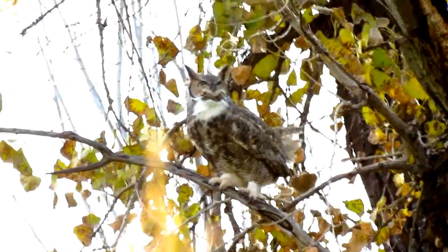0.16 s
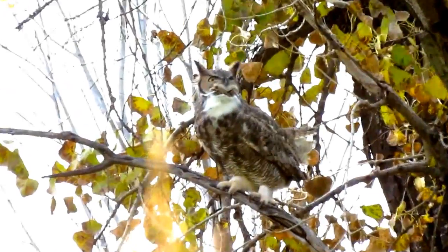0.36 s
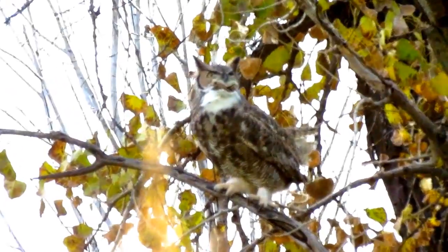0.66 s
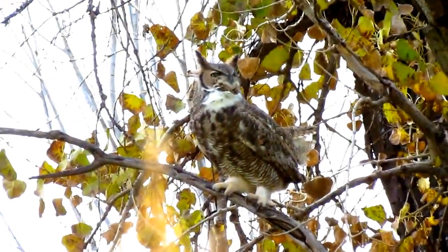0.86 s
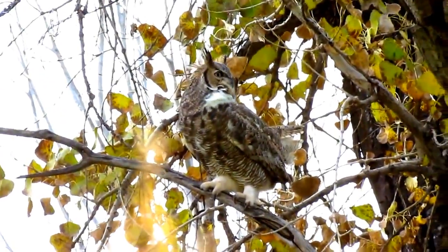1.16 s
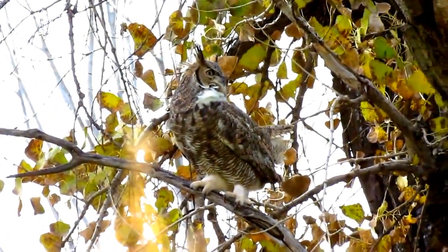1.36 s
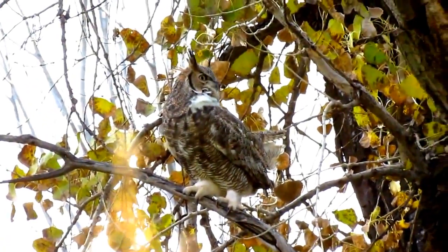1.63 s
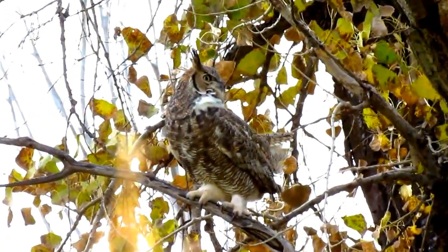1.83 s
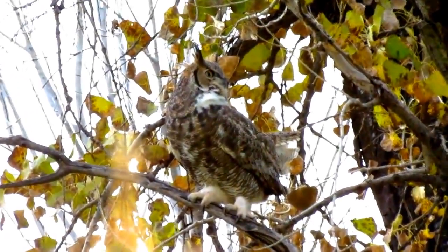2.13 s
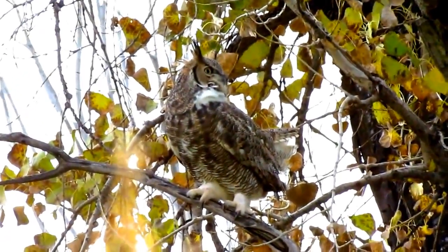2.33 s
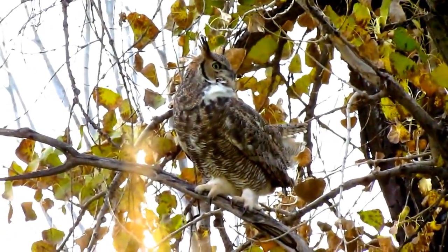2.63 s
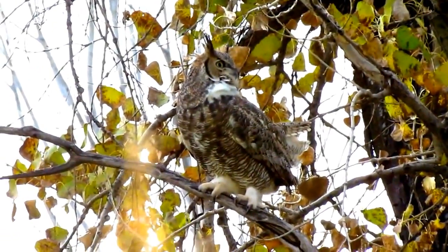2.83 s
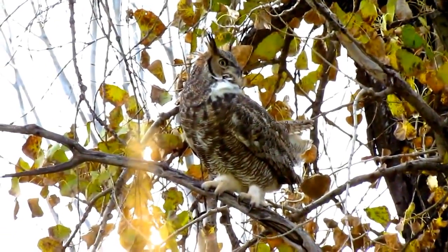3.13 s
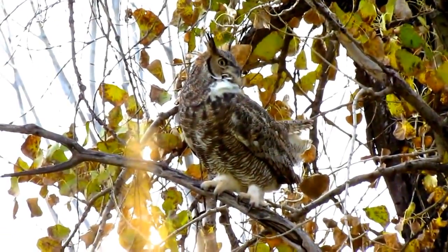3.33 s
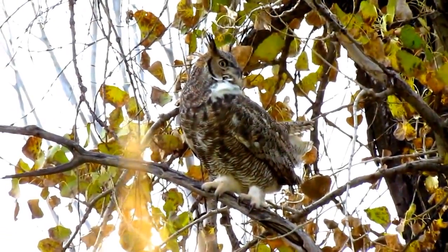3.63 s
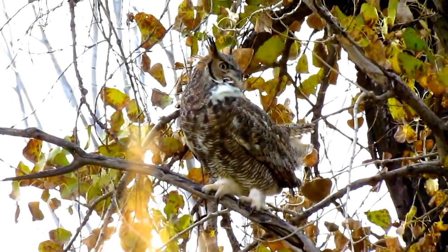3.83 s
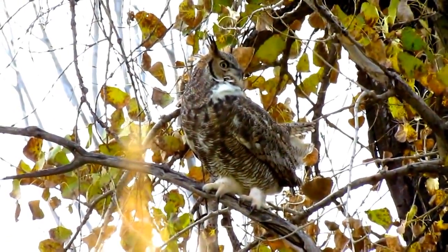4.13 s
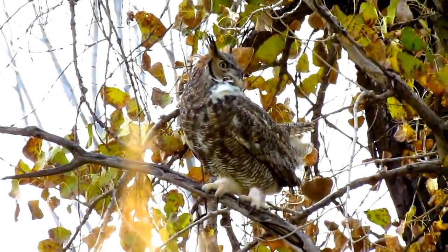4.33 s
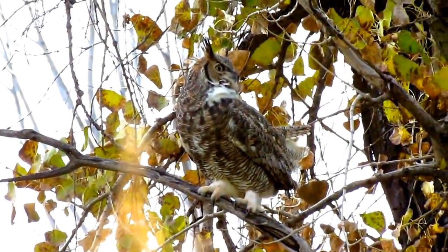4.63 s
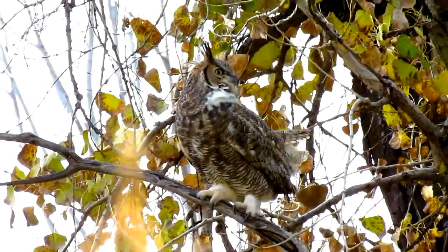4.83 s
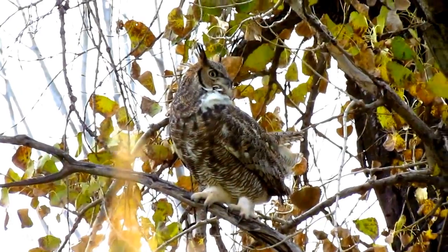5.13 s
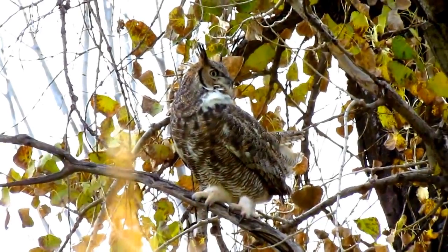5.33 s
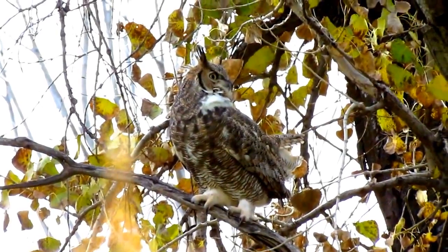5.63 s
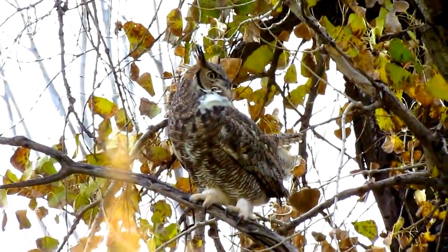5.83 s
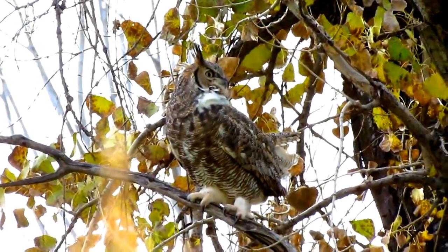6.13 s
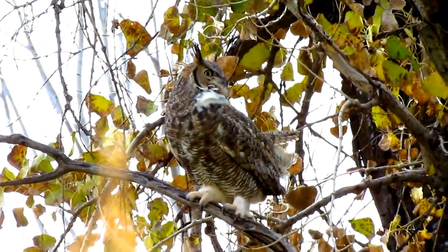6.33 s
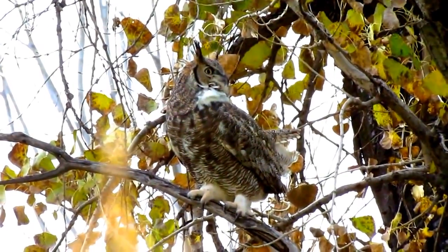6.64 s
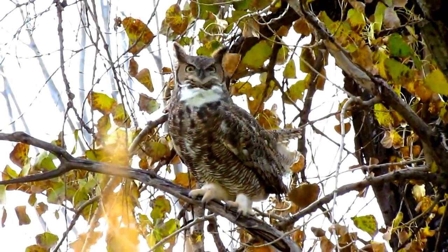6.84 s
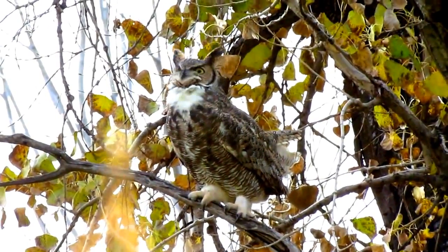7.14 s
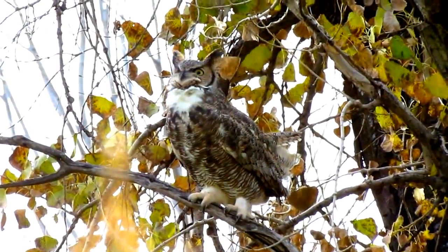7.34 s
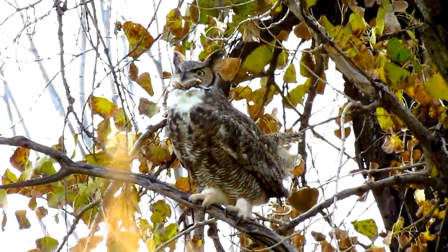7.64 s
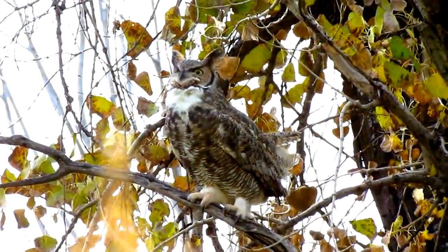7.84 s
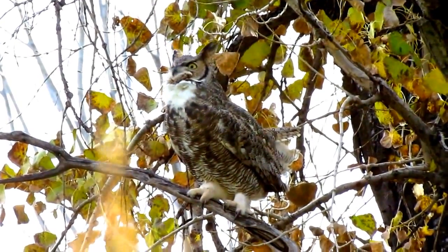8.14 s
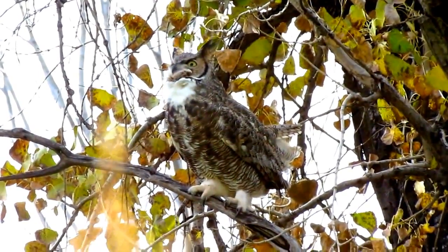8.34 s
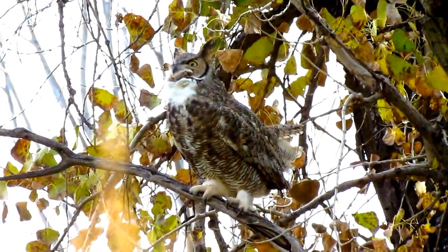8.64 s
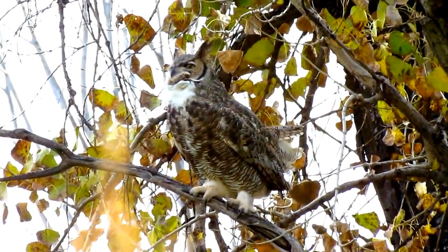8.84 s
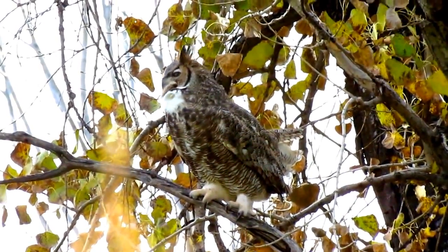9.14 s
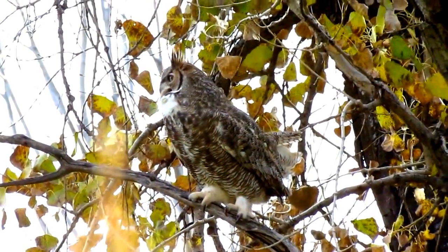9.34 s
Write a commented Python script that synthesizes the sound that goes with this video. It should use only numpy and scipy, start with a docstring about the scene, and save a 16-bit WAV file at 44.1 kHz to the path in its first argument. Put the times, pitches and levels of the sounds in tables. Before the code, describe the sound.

A sparrow repeats short, hoarse chirps in the branches over the soft rumble of far roads. At first, sharp clicks, finger scuffs and brief gritty lens whirs from a camera sound very close and stand out above everything else, then thin to occasional light ticks. A barely audible cricket pulses, a smaller bird lisps now and then, and a high, pulsing insect rasp rises faintly at the end.

```python
"""Under an autumn tree, far traffic washes and hums behind a faint cricket from start to end.
In the first two seconds a hand-held camera, aimed at a silent owl, clicks, its lens motor whirs
and a finger scuffs its shell. A few softer clicks follow, while a sparrow keeps chirping among the
branches and a smaller bird lisps. Towards the end the rasp of an insect's wings swells."""
import sys
import numpy as np
from scipy import signal
from scipy.fft import rfft, irfft, next_fast_len
from scipy.io import wavfile
from scipy.ndimage import map_coordinates

SR = 44100
rng = np.random.default_rng(int(sys.argv[2]) if len(sys.argv) > 2 else 0)


def digitize_waveform(pressure):
    """Quantize a signal to 16-bit integers and store it at the path in sys.argv[1].

    Rows of a 2-D input are taken as channels; values are limited to [-1, 1].
    """
    field = np.atleast_2d(pressure).T
    bounded = np.clip(field, -1, 1)
    quanta = np.round(bounded * 32767).astype(np.int16)
    wavfile.write(sys.argv[1], SR, quanta)


N = 418068


def amp(db):
    """Turn decibels into a gain to multiply by."""
    return 10 ** (np.asarray(db) / 20)


def unit(x):
    """Scale a sound to an average (rms) level of 1."""
    return x / np.sqrt(np.mean(x ** 2) + 1e-20)


def clock():
    """The time of every sample, in seconds."""
    return np.arange(N) / SR


def bell(t, centre, width):
    """A smooth bump of height 1, down to 0.6 at one width from its centre."""
    return np.exp(-((t - centre) / width) ** 2 / 2)


def along(points, hz):
    """Read between a table's (frequency, value) points, with octaves evenly spaced."""
    known_hz, values = np.transpose(points)
    return np.interp(np.log(hz + 1), np.log(known_hz + 1), values)


def wobble(rate, samples=N):
    """A smooth curve through rate random values a second."""
    points = rng.standard_normal(int(samples * rate / SR) + 4)
    return map_coordinates(points, [np.arange(samples) / SR * rate])


def cycles(hz):
    """The running phase, in radians, of a changing pitch."""
    return 2 * np.pi * np.cumsum(hz) / SR


def filtered(x, response):
    """Scale each frequency in x by response(hz)."""
    size = next_fast_len(N + 8192)
    return irfft(rfft(x, size) * response(np.fft.rfftfreq(size, 1 / SR)), size)[..., :N]


def add(track, start_s, sound):
    """Mix a sound into a track from start_s on."""
    at = round(start_s * SR)
    part = sound[..., max(-at, 0):N - at]
    track[..., max(at, 0):max(at, 0) + part.shape[-1]] += part


def rush(spectrum, left_lead_s=0):
    """Stereo noise shaped by a spectrum; the two sides are most alike in the bass."""
    # how alike left and right are: frequency_hz, likeness (1 = the same)
    alike = [(60, 0.93), (130, 0.85), (290, 0.91), (640, 0.86), (1410, 0.57), (3100, 0.06), (6820, 0.034),
             (15000, -0.2)]
    spread = lambda hz: np.arccos(np.clip(along(alike, hz), -1, 1)) / 2
    colour = lambda hz: amp(along(spectrum, hz)) * [np.cos(spread(hz)), np.sin(spread(hz))]
    mid, side = filtered(rng.standard_normal((2, N)), colour)
    return unit(np.array([mid + side, np.roll(mid - side, round(left_lead_s * SR))]))


def trees(call, echo_db, fade_s, side_db):
    """Trunks and leaves scatter a call into echoes that fall 60 dB in fade_s."""
    t = np.arange(SR * 3 // 4) / SR
    mid, side = rng.standard_normal((2, len(t))) * amp(-60 * t / fade_s) * (1 - np.exp(-t / 0.0009))
    paths = np.array([mid + amp(side_db) * side, mid - amp(side_db) * side])
    paths *= amp(echo_db) / np.linalg.norm(paths[0])
    paths[:, 0] += 1  # the direct path
    heard = signal.fftconvolve(call[None], paths, axes=1)
    return heard * np.linalg.norm(call) / np.linalg.norm(heard[0])


def traffic(drone_hz=73.9, waver_hz=0.615):
    """Far roads rumble, tyres wash, one engine drones and others come and go, over an even hiss."""
    # tone of the road rumble, the tyres and the hiss: frequency_hz, level_db
    rumble_tone = [(15, -13), (28, 0.5), (44, 4.5), (60, 2), (80, -11.5), (90, 4.5), (99, -5.5),
                   (110, -0.5), (125, -4), (150, -8), (300, -12), (600, -44.5)]
    tyre_tone = [(90, -6.5), (180, -2), (280, -1.5), (420, -4.5), (650, -2), (850, -1), (1050, -2.5),
                 (1300, -10), (1600, -17), (2000, -26.5), (3000, -58)]
    hiss_tone = [(800, -3.5), (2000, 5), (3000, 4), (5000, -0.5), (7500, -4), (10000, -7.5), (13000, -12.5),
                 (15500, -48)]
    # passing engines: nearest_s, width_s, pitch_hz, level_db
    engines = [(2.2, 0.72, 91.7, -51.5), (4.7, 1.1, 107.6, -54), (7.8, 1.2, 92.1, -54),
               (8.8, 0.42, 134.9, -49.5)]
    t = clock()
    rumble = amp(-46 + 0.18 * t + 0.8 * wobble(4.4)) * rush(rumble_tone)  # slowly builds
    busy_db = 2 * bell(t, centre=8.56, width=1.04)  # the road is busiest near the end
    wash = amp(-42 + busy_db + 0.17 * wobble(11)) * rush(tyre_tone, left_lead_s=0.0001)
    hum = lambda hz: np.sqrt(2) * np.sin(cycles(hz + waver_hz * wobble(5)))
    swell_db = 3 * bell(t, centre=5.55, width=0.74)
    drone = amp(-50 + swell_db + 1.8 * wobble(3.5)) * hum(drone_hz)  # fades in and out on the air
    passing = sum(amp(db) * bell(t, at_s, width_s) * hum(hz) for at_s, width_s, hz, db in engines)
    return rumble + wash + drone + passing + amp(-58) * rush(hiss_tone)


def cricket(pitch_hz=2110, width_hz=82, trill_at_s=4.256, every_s=0.746):
    """A faint, narrow trill comes in a slow, even beat, blurred by distance."""
    song = rush([(pitch_hz - 4 * width_hz, -50), (pitch_hz - width_hz, -4), (pitch_hz, 0),
                 (pitch_hz + width_hz, -4), (pitch_hz + 4 * width_hz, -50)])
    beat_db = 3 * np.tanh(2 * np.cos(2 * np.pi * (clock() - trill_at_s) / every_s))
    return amp(-64 + beat_db + 0.69 * wobble(8.5)) * song


def insect_rasp(phrase_s=0.1935, phrase_end_s=8.914, stroke_gap_s=0.019, full_s=9.4, rise_db_per_s=7):
    """An insect rasps in phrases of quick wing strokes; each phrase grows, then breaks off."""
    # tone of the wings: frequency_hz, level_db
    wing_tone = [(3500, -5), (6500, 8), (10800, 3), (13000, -3), (15500, -6)]
    t = clock()
    to_end_s = (phrase_end_s - t + stroke_gap_s) % phrase_s - stroke_gap_s
    strokes_left = np.maximum(np.round(to_end_s / stroke_gap_s), 0)
    strokes = amp(-1.5 * strokes_left) * bell(to_end_s, strokes_left * stroke_gap_s, width=0.002)
    blur = amp(-11) * bell(to_end_s, stroke_gap_s, width=0.04)
    warm_up_db = -51 - rise_db_per_s * np.maximum(full_s - t, 0)
    song = amp(warm_up_db) * (strokes + blur) * rush(wing_tone)[0]
    return np.array([np.roll(song, 3), song])  # reaches the left side three samples later


def small_bird():
    """A smaller bird lisps thin, quivering whistles from farther branches."""
    # gliding notes: start_s, length_s, from_hz, to_hz, relative_db
    lisps = [(0.755, .02, 8500, 8200, -62), (2.208, 0.018, 8200, 8500, -65),
             (5.603, 0.057, 5900, 7660, -56), (6.448, 0.069, 6100, 6900, -64),
             (6.248, 0.013, 5000, 4300, -57), (9.015, 0.35, 3380, 4000, -66),
             (9.157, 0.15, 4970, 5100, -68), (9.261, 0.18, 3990, 4450, -59.5)]
    out = np.zeros((2, N))
    for start_s, length_s, from_hz, to_hz, db in lisps:
        progress = np.linspace(0, 1, int(length_s * SR))
        glide_hz = from_hz + (to_hz - from_hz) * progress
        quiver = 1 + 0.04 * wobble(600, len(progress))
        note = np.sin(np.pi * progress) * np.sin(cycles(glide_hz * quiver))
        add(out, start_s, trees(2 * amp(db) * note, echo_db=1.5, fade_s=0.35, side_db=3))
    return out


def sparrow(rise_s=0.019, hold_s=0.048, fall_s=0.023, arch_depth=0.25):
    """Each hoarse chirp arches twice in pitch; the throat favours the octave above that pitch."""
    # chirps: start_s, relative_db, top_pitch_hz
    chirps = [(-0.06, -46.5, 1927), (0.597, -44.5, 1920), (1.312, -46, 1892), (1.917, -44, 1960),
              (2.774, -49, 1880), (3.803, -46, 1950), (4.551, -45.5, 1948), (5.142, -46.5, 1946),
              (6.077, -47.5, 1882), (6.846, -45, 1923), (7.393, -44.5, 1816)]
    # pitch arches within a chirp: middle_s, width_s
    arches = [(.043, .018), (.09, .014)]
    # how the throat shapes the voice: frequency_hz, gain_db
    throat = [(1500, -18), (1850, -8), (2600, -8), (3100, -2.5), (3900, 2.5), (4450, -9), (5150, -1.5),
              (5750, -10), (6250, -9), (7200, -25)]
    out, t = np.zeros((2, N)), np.arange(SR // 8) / SR
    effort = np.minimum(t / rise_s, 1) * np.exp(-np.maximum(t - rise_s - hold_s, 0) / fall_s)
    beak_db = -14.5 + 20 * bell(t, 0, width=0.026)  # the closing beak dulls the upper overtones
    bumps = np.max([bell(t, middle_s, width_s) for middle_s, width_s in arches], axis=0)
    tune = 1 - arch_depth * (1 - bumps)
    for start_s, db, top_hz in chirps:
        quiver, grate, drift = (wobble(rate, len(t)) for rate in (900, 600, 40))
        pitch_hz = top_hz * tune * (1 + 0.033 * quiver + 0.012 * drift)
        phase = cycles(pitch_hz)
        voice = sum(amp(along(throat, k * pitch_hz) + beak_db * (k > 2)) * np.sin(k * phase)
                    for k in range(1, 5))
        chirp = amp(db + 1 + 2.5 * grate) * effort * voice
        add(out, start_s, trees(chirp, echo_db=5.5, fade_s=0.58, side_db=0.5))
    return out


def finger_scuffs(grain_db=3):
    """Skin catches and slides on the camera's shell."""
    # scuffs: middle_s, level_db, width_s
    scuffs = [(0.023, -51, 0.0022), (0.054, -40.5, 0.0038), (1.35, -44.5, 0.0089), (1.389, -44, .003),
              (1.402, -44, .002), (1.595, -57.5, 0.011)]
    # tone of the sliding skin: frequency_hz, level_db
    skin_tone = [(1500, -10), (4000, 7.5), (6000, 4), (9000, -1), (13000, -7), (16000, -12)]
    t = clock()
    pressure = sum(amp(db) * bell(t, middle_s, width_s) for middle_s, db, width_s in scuffs)
    return pressure * unit(rush(skin_tone) * amp(grain_db * wobble(1300)))


def lens_motor(grain_db=1.5, flutter_db=1.7, ramp_s=0.012):
    """The lens gears whir in short, gritty runs."""
    # motor runs: start_s, end_s, level_db
    runs = [(0.137, 0.54, -50.5), (1.692, 1.79, -55.5), (1.785, 2.01, -50.5)]
    # tone of the gears: frequency_hz, level_db
    gear_tone = [(500, -32), (1400, 16), (2200, 12), (2900, 3.5), (3800, 6), (4600, 3.5), (7000, 2.5),
                 (8200, 6), (9200, 3), (11400, 5.5), (13300, -1), (14200, -14), (16000, -4)]
    t = clock()
    running = sum(amp(db) * np.clip(np.minimum(t - start_s, end_s - t) / ramp_s + 0.5, 0, 1)
                  for start_s, end_s, db in runs)
    return running * unit(rush(gear_tone) * amp(grain_db * wobble(400) + flutter_db * wobble(40.9)))


def camera_clicks(part_fade_s=0.021, crack_fade_s=0.02, crack_hz=1100):
    """Each click rings the shell and the touched part; a softer contact leaves the high notes quiet."""
    # clicks: start_s, level_db, brightness_hz, left_minus_right_db, part_pitch_hz, part_relative_db
    clicks = [(0.0235, -21.5, 1990, -3, 616, -8), (0.0516, -40, 7000, -3, 610, -6),
              (0.172, -32.5, 1800, 0, 970, 3.5), (0.496, -40.5, 2970, 2, 1600, 7),
              (0.5328, -20.5, 1500, 0, 890, 0.5), (0.6584, -8.5, 6600, -6, 1700, -13),
              (1.1499, -42, 3480, -2, 950, -10), (1.418, -23, 7050, -7.5, 3490, -2.5),
              (1.6931, -14, 794, 8.5, 1465, -2.5), (1.802, -35, 3000, 3, 2080, -10),
              (1.9465, -9.5, 7000, -6.5, 1580, -13), (2.006, -29, 2570, -9, 1560, -1),
              (3.8163, -29, 7840, -8, 3100, -2.5), (4.8142, -45, 4000, 0, 3120, -6),
              (4.8394, -41, 4500, 0, 3150, -10), (6.194, -40.5, 4460, 3, 3100, -6)]
    # notes of the plastic shell: pitch_hz, level_db, fade_s (to fall 60 dB), left_minus_right_db
    shell = [(597, -14, 0.039, -2.5), (810, -15.5, 0.058, -3.5), (1100, -8, 0.011, -11),
             (1443, -11, 0.033, -12.5), (1625, -7, 0.026, -7), (2052, -12.5, 0.029, 23),
             (2320, -7, 0.017, 5), (2780, -13, 0.019, -5), (3150, -17.5, 0.03, 9), (3985, -6, 0.011, -17),
             (4300, -6, 0.005, -2), (5340, -5.5, 0.0071, -10), (6130, -8, 0.0096, 0), (7000, -9, 0.01, -1),
             (8990, -9, 0.0074, 12), (10400, -13, 0.0093, -2), (11750, -14, .009, 2), (12450, -11, .009, 2),
             (13500, -18, .008, 6)]
    out, t = np.zeros((2, N)), np.arange(SR // 12) / SR
    hz, note_db, fade_s, note_pan_db = np.transpose(shell)[:, :, None]
    sides = np.array([[0.5], [-0.5]])
    swing = np.pi * np.arange(len(hz))[:, None]  # neighbouring notes swing in opposite directions
    onset = 1 - np.exp(-t / 0.00018)
    for start_s, db, bright_hz, pan_db, part_hz, part_db in clicks:
        strength = amp(note_db + rng.normal(0, 1, hz.shape) + sides[:, None] * note_pan_db)
        strength /= np.hypot(1, hz / bright_hz)
        phase = swing + 0.58 * rng.standard_normal((2, len(hz), 1))  # each side is a little out of step
        ring = np.sum(strength * amp(-60 * t / fade_s) * np.sin(2 * np.pi * hz * t + phase), axis=1)
        band = signal.butter(2, [crack_hz, min(crack_hz + bright_hz, SR / 3)], "band", fs=SR)
        noise = signal.lfilter(*band, rng.standard_normal((2, len(t))))
        crack = amp(-11 - 60 * t / crack_fade_s) * noise
        part = amp(part_db - 60 * t / part_fade_s) * np.sin(2 * np.pi * part_hz * t)
        add(out, start_s, amp(db + sides * pan_db) * (ring + crack + part) * onset)
    low_cut = signal.butter(3, 400, "high", fs=SR, output="sos")  # the clicks carry no bass below about 400 Hz
    return signal.sosfilt(low_cut, out)


def scene():
    """The camera close by, birds and insects in the trees, traffic beyond."""
    camera = camera_clicks() + lens_motor() + finger_scuffs()
    return camera + sparrow() + small_bird() + traffic() + cricket() + insect_rasp()


def record(dry, threshold=0.37, max_dip_db=3, recovery_s=0.23, top_hz=15800):
    """Automatic volume control dips after the loudest clicks; everything above top_hz is cut."""
    excess = np.maximum(np.abs(dry).max(axis=0) - threshold, 0)
    held = signal.lfilter([1], [1, -np.exp(-1 / (recovery_s * SR))], excess)
    gain = amp(-max_dip_db * np.tanh(held / 6))
    return filtered(np.clip(dry * gain, -1, 1), lambda hz: hz < top_hz)


dry = scene()
out = record(dry)
digitize_waveform(out)
```